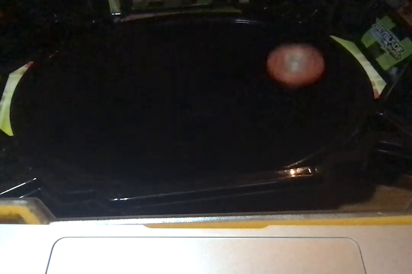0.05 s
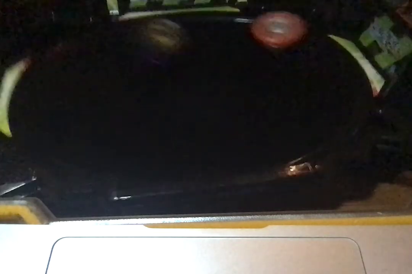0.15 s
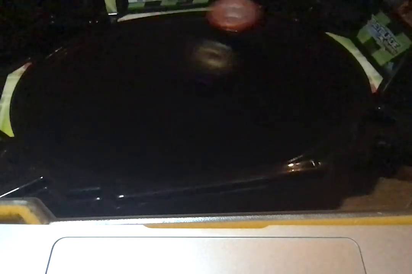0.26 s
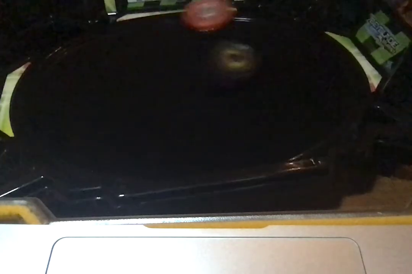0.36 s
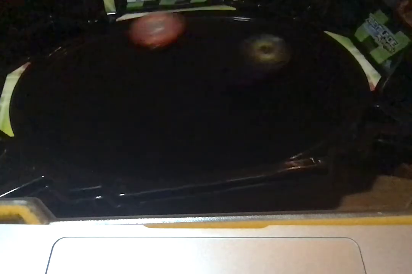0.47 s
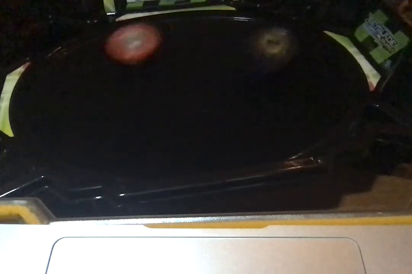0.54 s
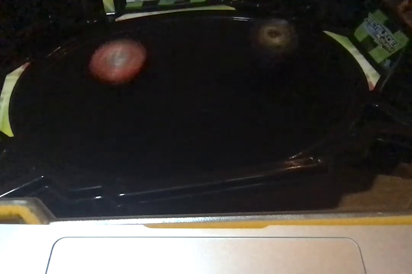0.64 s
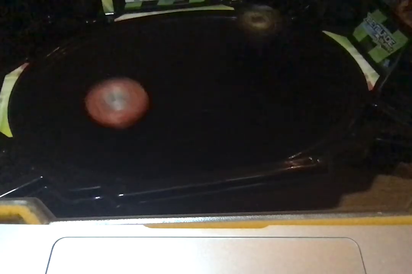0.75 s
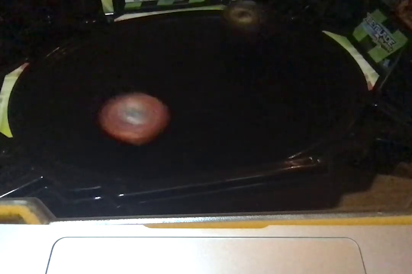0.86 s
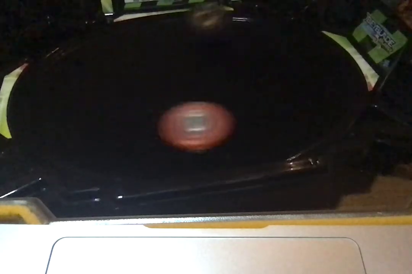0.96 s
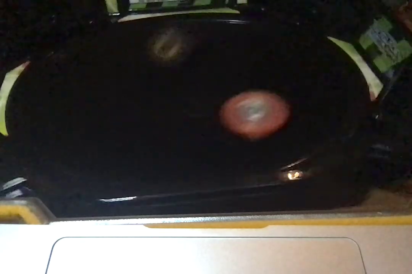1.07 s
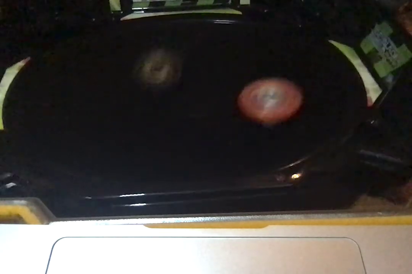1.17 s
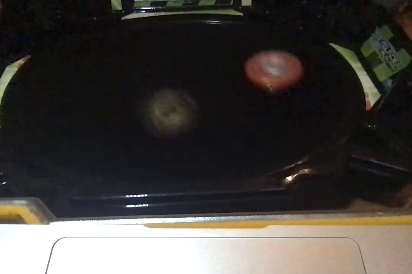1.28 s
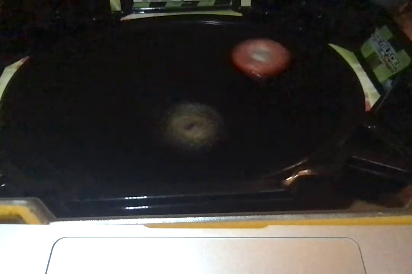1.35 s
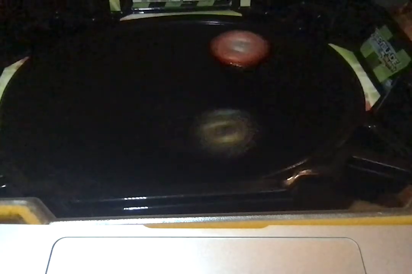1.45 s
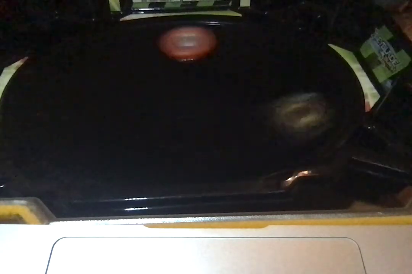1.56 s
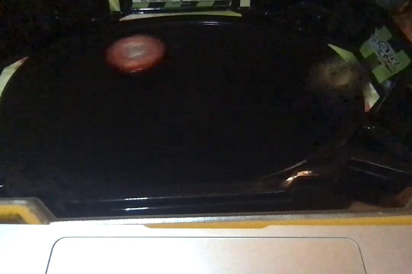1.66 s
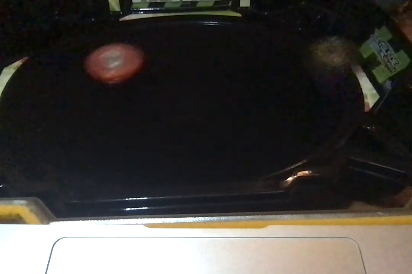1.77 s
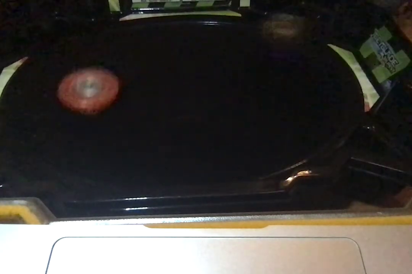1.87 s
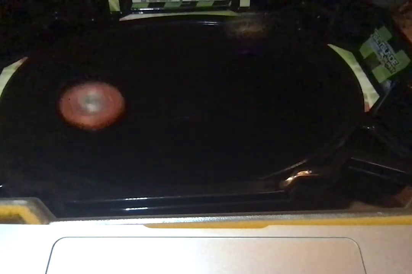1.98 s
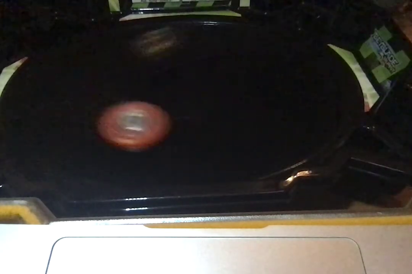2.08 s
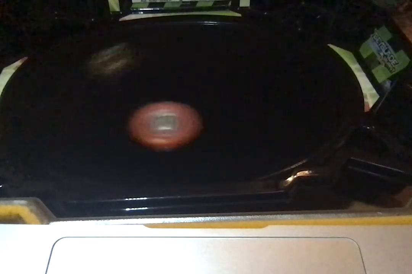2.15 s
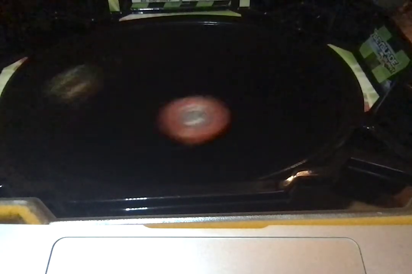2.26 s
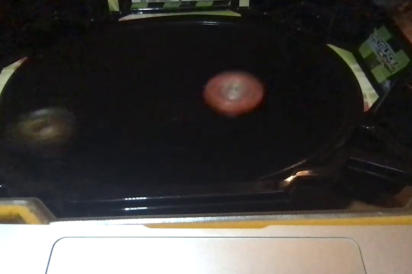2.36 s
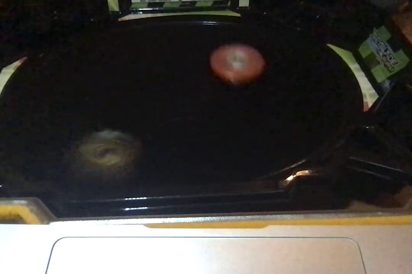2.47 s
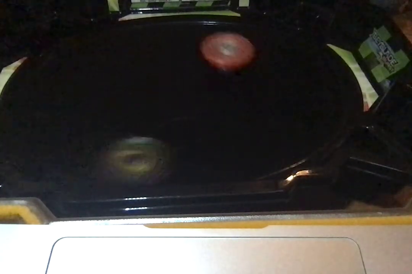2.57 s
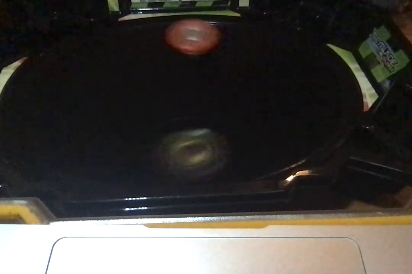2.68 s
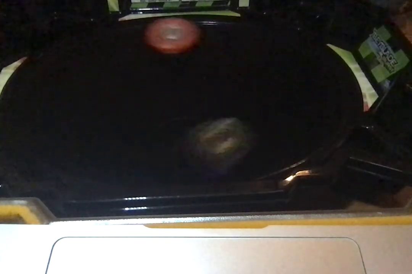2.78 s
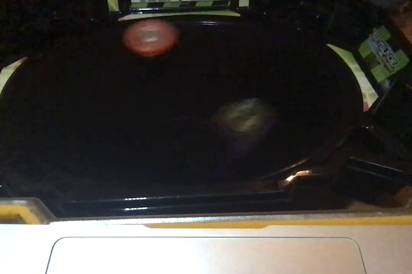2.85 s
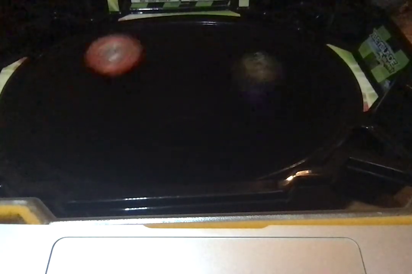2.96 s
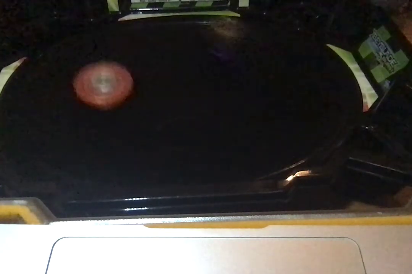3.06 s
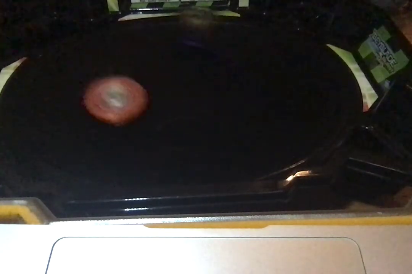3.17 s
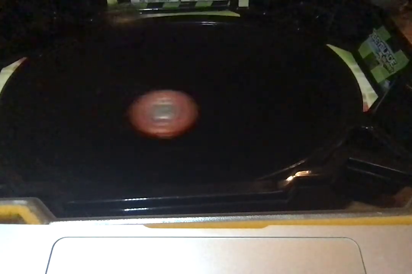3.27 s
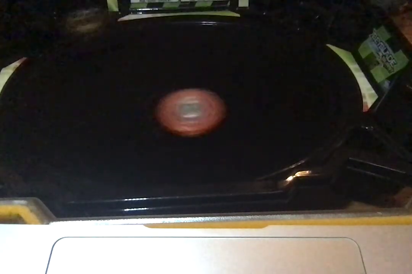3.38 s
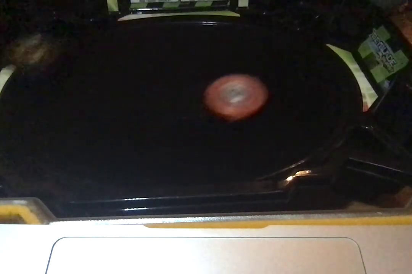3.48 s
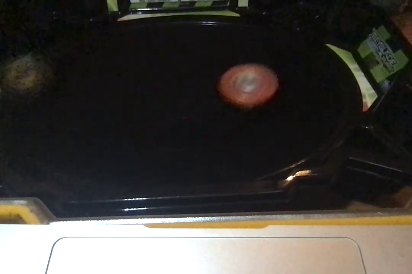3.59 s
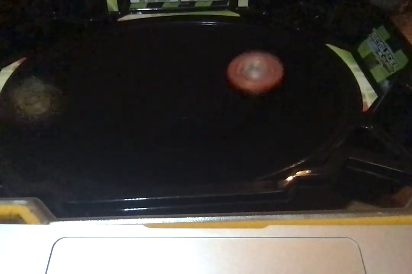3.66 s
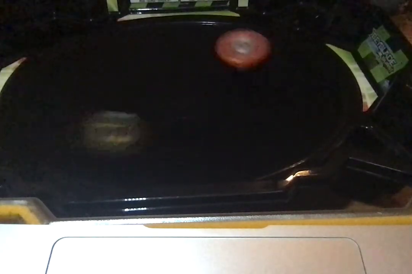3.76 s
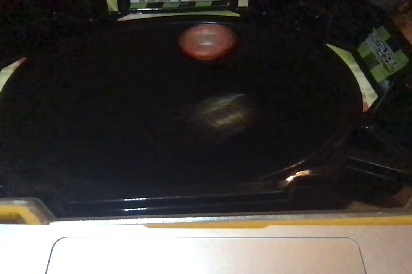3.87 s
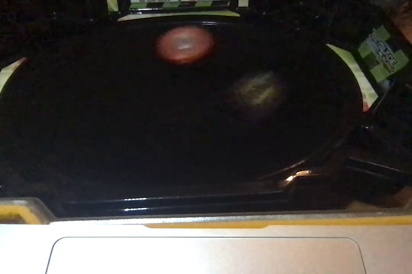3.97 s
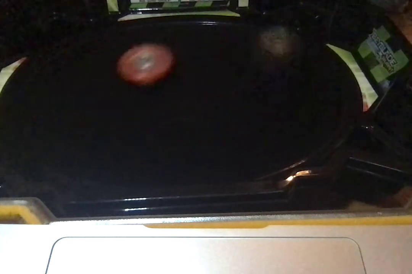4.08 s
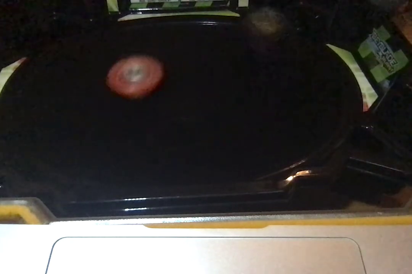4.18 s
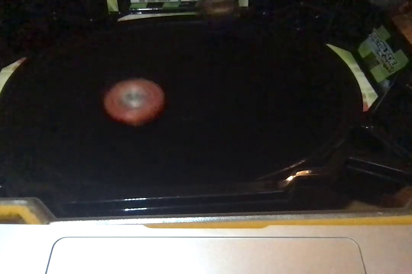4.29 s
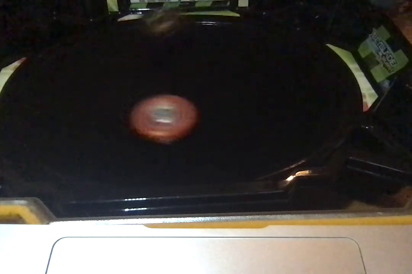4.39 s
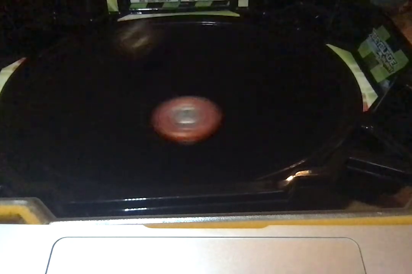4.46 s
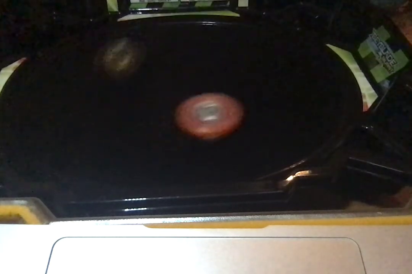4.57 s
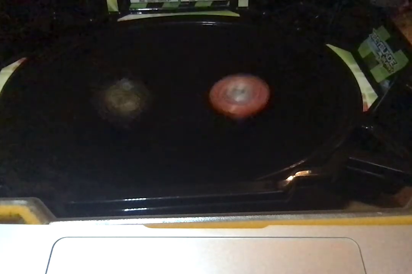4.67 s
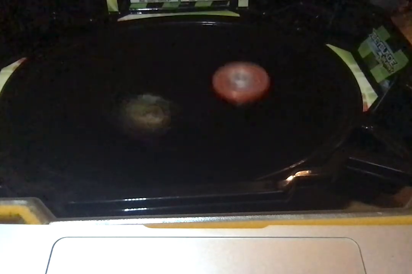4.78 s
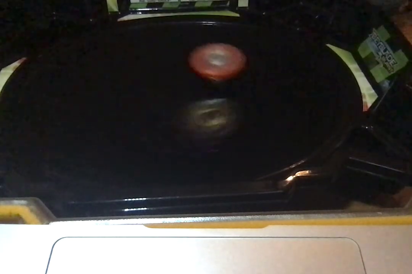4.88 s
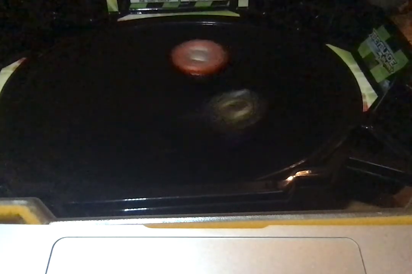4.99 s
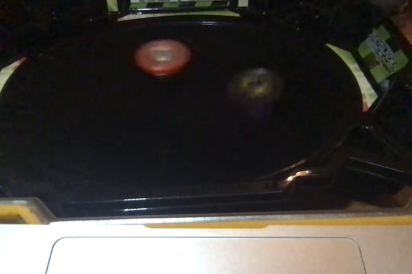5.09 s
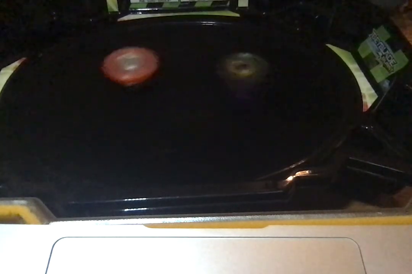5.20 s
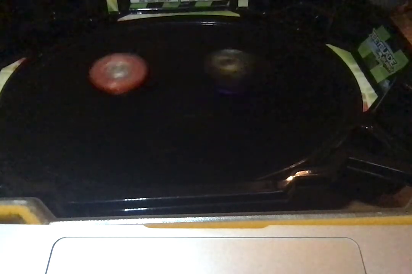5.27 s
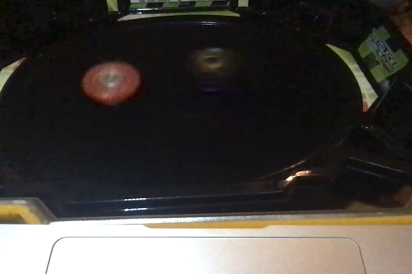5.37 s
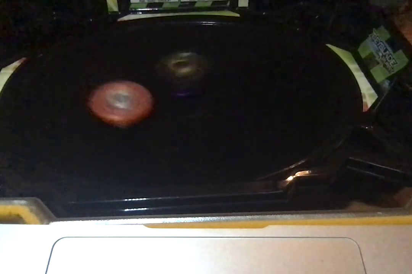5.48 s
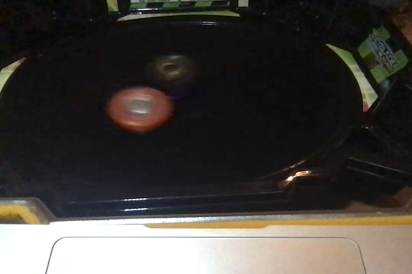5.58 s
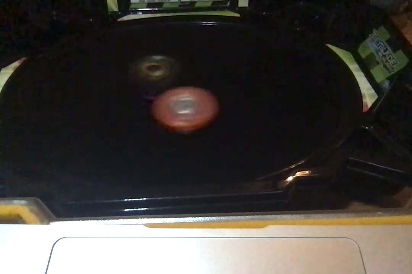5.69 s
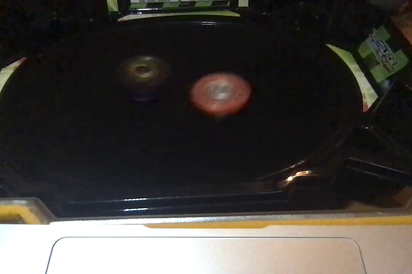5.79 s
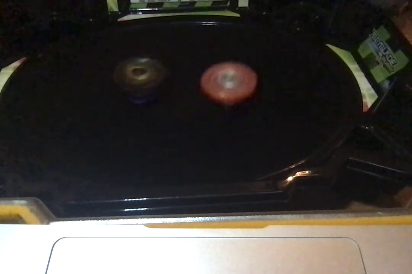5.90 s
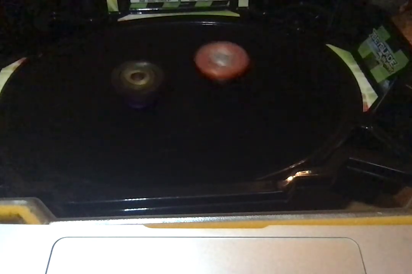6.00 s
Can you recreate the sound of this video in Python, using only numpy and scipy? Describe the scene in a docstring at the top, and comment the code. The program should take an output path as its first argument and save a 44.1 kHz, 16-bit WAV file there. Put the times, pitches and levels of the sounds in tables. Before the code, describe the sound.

A toy launcher snaps right at the start, and a spinning top lands in a thin plastic bowl with heavy, slightly distorted thumps. It bounces and skitters in quick ticks through the first 1.5 seconds. Its tip makes a buzzing scrape that swells and fades as it circles, peaking around 1.2, 2.1, 3.1, 3.9 and 4.6 seconds, with faint high squeaks early on. Underneath, the bowl rumbles and a second top hums low and smoothly.

Light knocks against the wall come around 1.5 seconds, a sharper hit at 2.3 starts a clatter lasting until 2.7, and rapid ticking follows until about 3.3. Another knock comes at 4.2. The whirring slowly drops in pitch and softens. At 5.6 seconds the metal rims clash with a sharp, briefly ringing crack, and a quiet hum continues to the end at six seconds. Everything is close, in a small room.

```python
"""A toy top races round a thin plastic bowl, close by in a small room. A launcher snaps and the top
lands with heavy thumps. Its tip scuffs the floor once a turn, ringing its body and the bowl; its
unbalance makes the bowl hum; it skips and knocks against the wall. A second top runs smoothly and
only hums. Near the end their metal rims clash."""
import sys
import numpy as np
from scipy import signal
from scipy.fft import rfft, irfft, next_fast_len
from scipy.io import wavfile
from scipy.ndimage import uniform_filter1d, map_coordinates

SR = 44100
rng = np.random.default_rng(int(sys.argv[2]) if len(sys.argv) > 2 else 0)


def generate_wav(sig):
    """Save sig (samples, or channels by samples) to the path in sys.argv[1] as 16-bit PCM at SR."""
    pcm = np.round(np.clip(np.atleast_2d(sig).T, -1, 1) * 32767).astype(np.int16)
    wavfile.write(sys.argv[1], SR, pcm)


N = 266364

# Levels in tables are relative.
# launcher ratchet snaps (time [s], level [dB])
RATCHET_SNAPS = [(.001, -5), (.003, -16.5), (.0123, -16.5), (.017, -23), (.021, -14.5)]
# racing top's spin speed, slowing unevenly (time [s], speed [Hz])
SPIN_CURVE = [(0, 80.65), (1.2, 78.43), (1.9, 70.93), (2.25, 68.88), (2.55, 61.32), (2.8, 62.6),
              (2.95, 56.6), (3.1, 59.06), (3.45, 55.77), (3.7, 56.23), (4.2, 54.63), (4.5, 51.56),
              (4.85, 51.62), (5.2, 49.17), (6.04, 46.06)]
# swells of the tip's scraping (peak time [s], 10 dB rise [s], 10 dB fall [s], level [dB])
SCRAPE_SWELLS = [(.22, 0.15, 0.087, -40.5), (.7, 0.49, 0.16, -50.5), (1.241, 0.26, 0.21, -37),
                 (2.071, 0.19, 0.27, -33), (3.068, 0.19, 0.2, -38.5), (3.58, 0.78, 0.064, -45),
                 (3.899, 0.25, 0.28, -33.5), (4.635, 0.21, 0.25, -34.5), (5.322, 0.07, .12, -44.5)]
# tip skitters after launch, wall hits and rough passes (start [s], end [s], depth [0-1])
SKITTER_SPELLS = [(0, .7, 0.74), (.75, .9, 0.42), (1.45, 1.64, 0.62), (2.33, 2.46, 0.67), (2.66, 2.72, 0.8),
                  (3.02, 3.1, 0.6)]
# tilted top touches mostly every second turn (start [s], end [s], even over odd turns [dB])
TILT_SPELLS = [(2.75, 3.68, 11)]
# tip squeaks at high speed (start [s], end [s], strength [0-1])
SQUEAK_SPELLS = [(.7, .8, 0.8), (1.0, 1.18, 1), (1.62, 1.66, 0.57), (1.86, 2.06, 0.74)]
# unbalance hum (time [s], once a turn [dB], twice a turn [dB])
UNBALANCE_LEVELS = [(.25, -35, -30.5), (.9, -42, -60), (1.17, -32, -37), (1.37, -22.5, -39),
                    (1.6, -37, -54), (1.95, -41, -36), (2.27, -17, -42), (2.45, -30.5, -44),
                    (2.98, -38.5, -35), (3.08, -21, -29), (3.2, -32, -34.5), (3.6, -35, -55),
                    (3.74, -31, -32), (3.87, -22, -41.5), (4.03, -46, -25), (4.16, -38, -37),
                    (4.3, -30, -46.5), (4.62, -46, -28.5), (4.85, -29.5, -44), (5.0, -42, -51.5),
                    (5.3, -33, -60), (5.7, -35, -41), (6.04, -44, -49)]
# smooth top's hum (time [s], frequency [Hz], level [dB])
SMOOTH_HUM = [(.25, 65.26, -25.5), (.45, 62.55, -31), (.58, 61.3, -15.5), (.72, 61.6, -33.5),
              (.86, 60.6, -17), (1.0, 56.6, -39), (1.38, 57.3, -23.5), (1.7, 60.3, -27.5), (2.9, 55, -30.5),
              (6, 48.9, -63.5)]
# hard landings and wall hits (time [s], click level [dB], wall level [dB])
KNOCK_HITS = [(0.0381, -11, -9.5), (0.045, -10, -8.5), (0.1328, -22, -12), (.168, -17.5, -20.5),
              (.177, -18, -12), (.208, -17, -23), (0.223, -30, -19), (1.425, -22.5, -24),
              (1.494, -22, -27.5), (1.577, -22, -30), (1.6405, -34.5, -25), (1.6571, -27.5, -25),
              (1.6945, -21, -37), (2.3037, -8, -17.5), (2.3688, -23.5, -20.5), (2.4204, -33, -24.5),
              (2.4567, -26, -27), (2.49, -29.5, -28.5), (2.5598, -14.5, -15), (2.5752, -21.5, -22),
              (2.659, -30, -34), (2.6729, -25.5, -24), (2.7048, -20, -25), (4.2082, -19, -22)]
# jolts of the whole bowl (time [s], level [dB])
THUMP_HITS = [(.0385, 6), (.134, 2), (.177, -7), (.645, -21), (2.308, -14), (2.712, -21), (5.605, -28)]
# tip landings after skips (time [s], level [dB])
SKIP_HITS = [(.2652, -19), (0.3136, -12), (.3229, -14.5), (0.337, -22), (0.347, -16.5), (0.3561, -13),
             (.389, -14), (0.4264, -11), (0.4695, -15.5), (0.5054, -15.5), (0.554, -16), (0.5614, -20.5),
             (0.608, -15.5), (0.6455, -11.5), (.6646, -28), (0.6832, -21.5), (0.6996, -35), (0.723, -29),
             (0.7485, -28), (0.762, -20.5), (0.7837, -25.5), (0.85, -25.5), (0.8866, -25.5), (0.9258, -14),
             (1.116, -14), (1.142, -13), (1.1677, -16), (1.178, -20), (1.206, -13.5), (1.2308, -18),
             (1.256, -18), (1.27, -17), (1.296, -10.5), (1.308, -19), (1.3349, -13), (1.3748, -16),
             (1.3845, -26), (1.4567, -20), (1.6126, -26), (1.6273, -23.5), (2.0029, -16), (2.114, -18),
             (2.201, -29), (2.2336, -17), (2.2753, -27), (2.7218, -26), (2.7463, -26), (2.7859, -18.5),
             (2.8485, -19.5), (2.88, -22.5), (2.9117, -23), (2.9884, -18.5), (3.022, -17.5), (3.0542, -19),
             (3.0868, -21), (3.1199, -23), (3.153, -20), (3.186, -30), (3.2191, -20.5), (3.253, -17),
             (3.2863, -13.5), (3.38, -27.5), (3.457, -14.5), (3.5797, -21.5), (3.9156, -24), (4.008, -27),
             (4.2629, -19.5), (4.802, -18.5), (4.8553, -22.5)]
# tops graze, then clash (time [s], level [dB])
CLASH_HITS = [(5.574, -35), (5.5796, -24.5), (5.583, -29.5), (5.599, -9)]

# resonances (frequency [Hz], level [dB])
BODY_MODES = [(3550, -5.5), (6200, -2), (7000, 3), (8050, 5)]  # racing top's hollow body
METAL_RIM_MODES = [(2760, -18.5), (3290, -13), (5950, -14), (6750, -6.5), (7290, -2), (8420, -5.5),
                   (9400, 4), (10100, -5.5), (12050, -9)]
# bowl resonances (frequency [Hz], level [dB], t60 [s])
BOWL_WALL_MODES = [(701, -7.5, 0.058), (862, -6, 0.05), (1149, -1, 0.03), (1435, -6, .03),
                   (1648, -6.5, 0.035), (2580, -4, 0.0031), (3300, -16, 0.041)]
BOWL_LOW_MODES = [(64, -18.5, 0.33), (81, 5.5, 0.043), (118.3, -3, 0.079), (217, -25.5, 0.16)]
# room decay (frequency [Hz], t60 [s])
ROOM_DECAY = [(150, 0.86), (2800, 0.16), (7000, 0.15), (14000, 0.13)]

# spectra (frequency [Hz], density [dB])
CRACK_SPECTRUM = [(300, -28.5), (2000, -16.5), (3000, -8), (4400, -11.5), (6000, 0), (7100, 0.5),
                  (9400, -9), (13500, -13.5), (16000, -30)]
SHIMMER_SPECTRUM = [(300, -20), (1000, -6), (4000, -17), (5500, -2.5), (9000, -6), (10500, -19),
                    (16000, -38)]  # crack as sent towards the room's walls
RASP_SPECTRUM = [(900, -24.5), (1600, -2.5), (3400, 2.5), (5000, -7), (6200, 3.5), (8400, 0.5), (9100, -12),
                 (10000, -9), (11200, -25.5), (13000, -25.5), (16000, -44)]
FLOOR_SPECTRUM = [(120, -26), (240, -4), (440, 2), (530, -2.5), (720, 4.5), (1200, 2.5), (1600, 0),
                  (1950, -10.5), (5000, -15), (10000, -41)]
RUMBLE_SPECTRUM = [(16, -30), (32, 0.5), (65, 2.5), (135, -7.5), (300, -30.5), (800, -76)]
SQUEAK_SPECTRUM = [(10500, -24.5), (11750, 3), (12300, -14), (13000, -1), (13800, 5.5), (14500, -15),
                   (16000, -34)]
TICK_SPECTRUM = [(900, -17.5), (1600, -5), (3400, 3.5), (5000, -2.5), (7000, 7.5), (8400, 1), (9200, -4.5),
                 (13500, -19), (16000, -26)]
WALL_SPECTRUM = [(120, -17.5), (440, -2), (700, 2.5), (1600, -1), (2000, -16), (5000, -11.5), (10000, -43)]  # bowl wall's crowded weaker modes
AIR_SPECTRUM = [(25, -13), (60, 5), (450, -12), (900, -8.5), (1900, -26), (8000, -27.5), (12000, -50)]

SCUFF_ATTACK_S, SCUFF_HOLD_S, SCUFF_RELEASE_S = 0.00028, 0.0027, 0.0015
SCUFF_SPREAD_DB, SKITTER_SPREAD_DB = 1.8, 9.5
DRAG_DB, DRAG_DB_PER_HZ = -28.5, 0.5458
ONSET_S, SETTLE_S, TILT_S, CALM_SKITTER = 0.053, 0.14, 0.021, 0.017
GLIDE_DB, SKITTER_SCUFF_DB = -67, -48.5  # tip between swells
FLOOR_DB, FLOOR_EXPONENT, SKITTER_FLOOR_DB = -13.5, 0.66, -40
RUMBLE_DB, RUMBLE_EXPONENT, RUMBLE_DB_PER_HZ = -32.5, 0.38, 0.5159
SQUEAK_DB, SIZZLE_DB = -59, -33


def amp(db):
    """Decibels to gain."""
    return 10 ** (np.asarray(db) / 20)


def unit(x):
    """Scale to rms 1."""
    return x / np.sqrt(np.mean(x ** 2) + 1e-20)


def along(points, hz):
    """Interpolate (frequency [Hz], value) points on a log axis."""
    knots_hz, values = np.transpose(points)
    return np.interp(np.log(hz + 1), np.log(knots_hz), values)


def curves(rows):
    """Per-sample curve for each column after the time."""
    times_s, *columns = np.transpose(rows)
    return [np.interp(np.arange(N) / SR, times_s, column) for column in columns]


def spells(rows, attack_s, release_s):
    """State that ramps up before each start, holds, and decays after the end."""
    t = np.arange(N) / SR
    return np.max([depth * np.clip((t - start) / attack_s + 1, 0, 1)
                   * np.exp(-np.maximum(t - end, 0) / release_s) for start, end, depth in rows], axis=0)


def wobble(rate_hz):
    """Smooth random curve."""
    knots = rng.standard_normal(int(N * rate_hz / SR) + 4)
    return map_coordinates(knots, [np.arange(N) * rate_hz / SR])


def coloured(x, spectrum):
    """Minimum-phase filter; keeps the power of white noise."""
    size = next_fast_len(N + SR // 2, real=True)
    gain = unit(amp(along(spectrum, np.fft.rfftfreq(size, 1 / SR))))
    cepstrum = irfft(np.log(gain), size)
    cepstrum[1:size // 2] *= 2
    cepstrum[size // 2 + 1:] = 0
    return irfft(rfft(x, size) * np.exp(rfft(cepstrum)), size)[:N]


def noise(spectrum):
    """Coloured noise, rms 1."""
    return coloured(rng.standard_normal(N), spectrum)


def grit(spread_db):
    """White noise of unequal micro-impacts."""
    return unit(rng.standard_normal(N) * amp(spread_db * rng.standard_normal(N)))


def patchy(x, depth_db, frame_samples=256):
    """x at rms 1 with randomly shifting colour."""
    frames = signal.stft(x, nperseg=frame_samples)[2]
    field = uniform_filter1d(rng.standard_normal(frames.shape), size=4, axis=0)
    field = uniform_filter1d(field, size=6, axis=1)
    gain = amp(depth_db * np.tanh(unit(field)))
    return unit(signal.istft(frames * gain, nperseg=frame_samples)[1][:N])


def blows(times_s, db):
    """One impulse per event."""
    return np.bincount(np.clip(np.round(times_s * SR).astype(int), 0, N - 1), amp(db), N)


def decay(force, t60_s):
    """Amplitude of a body that stores and loses the energy of each push."""
    retained = amp(-60 / (t60_s * SR)) ** 2
    return np.sqrt(signal.lfilter([1], [1, -retained], force ** 2))


def cracks(hits, t60_s):
    """Hard on hard, ratchet or rims: short, bright noise bursts."""
    envelope = decay(blows(*np.transpose(hits)), t60_s)
    return coloured(envelope * rng.standard_normal(N), CRACK_SPECTRUM)


def shimmer(hits, t60_s=0.31, build_s=0.014):
    """Cracks scatter off the room's walls into a dense, bright tail."""
    energy = decay(blows(*np.transpose(hits)), t60_s=0.021) ** 2
    t = np.arange(SR // 2) / SR
    tail = amp(-60 * t / t60_s) ** 2 * (1 - np.exp(-(t / build_s) ** 2))
    envelope = np.sqrt(np.abs(signal.fftconvolve(energy, tail / tail.sum())[:N]))
    return envelope * noise(SHIMMER_SPECTRUM)


def tip_contact(shape=2.39):
    """Scraping swells and fades as the top moves round the bowl; shape > 2 is flatter than a bell."""
    t = np.arange(N) / SR
    swells = [amp(db - 10 * np.abs((t - peak_s) / np.where(t < peak_s, rise_s, fall_s)) ** shape)
              for peak_s, rise_s, fall_s, db in SCRAPE_SWELLS]
    return np.linalg.norm(swells, axis=0)


def scuffs(turns, spin_hz, skitter, tilt_db, back_width_s=0.0009):
    """Tip force: an abrupt scuff each turn, a weak one half a turn later, light drag between."""
    turns = turns + 0.53 * skitter * wobble(55)  # skittering tip lands early or late
    turn = np.round(turns).astype(int)
    even, odd = amp(tilt_db / 2), amp(-tilt_db / 2)
    size = np.where(turn % 2, odd, even) / np.sqrt((even ** 2 + odd ** 2) / 2)
    scatter = np.minimum(rng.standard_normal(turn.max() + 1), 1)[turn]
    size = size * amp((SCUFF_SPREAD_DB + SKITTER_SPREAD_DB * skitter) * scatter)
    since_s = (turns - turn) / spin_hz
    attack = np.minimum(since_s + SCUFF_HOLD_S / 2, 0) / SCUFF_ATTACK_S
    release = np.maximum(since_s - SCUFF_HOLD_S / 2, 0) / SCUFF_RELEASE_S
    front = size * np.exp(attack - release)
    from_half_turn_s = 0.5 / spin_hz - np.abs(since_s)
    back = amp(-28 + 9 * np.tanh(wobble(60))) * np.exp(-from_half_turn_s / back_width_s)
    speed_db = DRAG_DB_PER_HZ * (spin_hz - spin_hz.min())
    drag = amp(DRAG_DB + speed_db + 4.2 * skitter + 10 * np.tanh(wobble(400)))
    return unit(np.sqrt(front ** 2 + back ** 2 + drag ** 2))


def pings(force, t60_s, spread_db, drift):
    """Top's body rings; mode levels and pitches shift as it turns."""
    ring, power = 0, 0
    for hz, db in BODY_MODES:
        glide = drift * np.tanh(wobble(70) + 0.296 * wobble(1500))
        gain = amp(db + spread_db * np.tanh(wobble(60)))
        ring = ring + gain * np.sin(2 * np.pi * np.cumsum(hz * (1 + glide)) / SR)
        power = power + gain ** 2
    envelope = decay(force, t60_s)
    return unit(ring / np.sqrt(power)) * envelope * np.linalg.norm(force) / np.linalg.norm(envelope)


def bowl_floor(envelope, depth_db):
    """Crowded modes of the plastic; the strong ones change with the top's position."""
    modes = patchy(rng.standard_normal(N), depth_db, frame_samples=1024)
    return coloured(envelope * modes, FLOOR_SPECTRUM)


def unbalance(turns, tilt_db, waver_db=1):
    """Bowl hums once and twice a turn; tilt adds a half-rate wobble."""
    first_db, second_db = [db + waver_db * wobble(19) for db in curves(UNBALANCE_LEVELS)]
    angle = 2 * np.pi * turns
    half = amp(-1.5) * (1 - amp(-tilt_db)) * np.cos(angle / 2)
    return np.sqrt(2) * (amp(first_db) * (half + np.cos(angle)) + amp(second_db) * np.sin(2 * angle))


def racing_top():
    """Tip rasps, pings and squeaks; the thin floor rings per scuff and rumbles more at speed."""
    spin_hz, = curves(SPIN_CURVE)
    turns = np.cumsum(spin_hz) / SR
    contact = tip_contact()
    skitter = np.maximum(spells(SKITTER_SPELLS, ONSET_S, SETTLE_S), CALM_SKITTER)
    tilt_db = spells(TILT_SPELLS, TILT_S, TILT_S)
    force = scuffs(turns, spin_hz, skitter, tilt_db)

    scrape = force * np.sqrt(contact ** 2 + amp(GLIDE_DB) ** 2 + (amp(SKITTER_SCUFF_DB) * skitter) ** 2)
    rasp = coloured(amp(-3) * scrape * patchy(grit(spread_db=5), depth_db=8), RASP_SPECTRUM)
    ring = amp(-6) * pings(scrape, t60_s=0.0041, spread_db=11, drift=0.044)

    shake = np.hypot(amp(FLOOR_DB) * contact ** FLOOR_EXPONENT, amp(SKITTER_FLOOR_DB) * skitter)
    floor = bowl_floor(shake * unit(decay(force, t60_s=0.042)), depth_db=7)
    rumble_db = RUMBLE_DB + RUMBLE_DB_PER_HZ * (spin_hz - spin_hz.mean())
    rumble = amp(rumble_db) * unit(shake) ** RUMBLE_EXPONENT * noise(RUMBLE_SPECTRUM)
    lumps = amp(4 * wobble(16))

    squeak_gain = amp(SQUEAK_DB) * spells(SQUEAK_SPELLS, ONSET_S, ONSET_S) + amp(SIZZLE_DB) * contact
    squeak = squeak_gain * unit(decay(force, t60_s=0.008)) * patchy(noise(SQUEAK_SPECTRUM), depth_db=13)
    return rasp + ring + squeak + floor + lumps * rumble + unbalance(turns, tilt_db)


def smooth_top(pitch_waver=0.0092):
    """Low, slightly unsteady hum at the rate of spin."""
    hz, db = curves(SMOOTH_HUM)
    hz = hz * (1 + pitch_waver * wobble(5))
    return np.sqrt(2) * amp(db - 2 + 0.9 * wobble(33)) * np.sin(2 * np.pi * np.cumsum(hz) / SR)


def room(x, build_s):
    """Small room's tail; lows last longest."""
    hz, t, frames = signal.stft(rng.standard_normal(SR // 2), SR, nperseg=256)
    tail = signal.istft(frames * amp(-60 * t / along(ROOM_DECAY, hz)[:, None]), SR, nperseg=256)[1]
    tail = tail * (1 - np.exp(-(np.arange(len(tail)) / SR / build_s) ** 2))
    return signal.fftconvolve(x, tail / np.linalg.norm(tail))[:N]


def knocks():
    """Top clicks and pings; the wall clacks, its modes differing from place to place."""
    times_s, click_db, wall_db = np.transpose(KNOCK_HITS)
    click = decay(blows(times_s, click_db - 9.5), t60_s=0.024)
    t = np.arange(SR // 8) / SR
    clack = np.zeros(N + len(t))
    for start_s, hit_db in zip(times_s, wall_db):
        for hz, db, t60_s in BOWL_WALL_MODES:
            place_db, detune = rng.normal(0, 1.5), rng.normal(0, 0.04)
            envelope = amp(hit_db + db + place_db - 2.5 - 60 * t / t60_s)
            mode = np.sin(2 * np.pi * hz * (1 + detune) * t) * rng.choice([-1, 1])
            clack[int(start_s * SR):][:len(t)] += envelope * mode
    shake = decay(blows(times_s, wall_db - 5.5), t60_s=0.055)
    wall = coloured(shake * rng.standard_normal(N), WALL_SPECTRUM)
    ring = amp(-4.5) * pings(click, t60_s=0.005, spread_db=8, drift=0.04)
    tick = coloured(click * patchy(grit(spread_db=3), depth_db=12), TICK_SPECTRUM)
    return tick + ring + clack[:N] + wall


def thumps():
    """Whole bowl bounces in its lowest modes."""
    t = np.arange(SR // 2) / SR
    ring = sum(amp(db - 60 * t / t60_s) * np.sin(2 * np.pi * hz * t) for hz, db, t60_s in BOWL_LOW_MODES)
    return -signal.fftconvolve(blows(*np.transpose(THUMP_HITS)), ring)[:N]


def skips(median_flight_s=0.0105, rebound_loss_db=13):
    """Tip lands with a tick, rings body and floor, rebounds once."""
    times_s, db = np.transpose(SKIP_HITS)
    flight_s = median_flight_s * np.exp(0.56 * rng.standard_normal(len(times_s)))
    force = blows(times_s, db) + blows(times_s + flight_s, db - rebound_loss_db)
    tick = coloured(decay(force, t60_s=0.018) * patchy(grit(spread_db=3), depth_db=7), TICK_SPECTRUM)
    ring = pings(decay(force, t60_s=0.012), t60_s=0.0061, spread_db=16.5, drift=0.058)
    floor = bowl_floor(decay(force, t60_s=0.052), depth_db=0.5)
    return amp(-10.5) * tick + amp(-9) * ring + amp(-15.5) * floor


def clashes(t60_cycles=216):
    """Rim meets rim: dry crack, brief metallic ring."""
    t = np.arange(SR // 8) / SR
    modes = sum(amp(db - 60 * hz * t / t60_cycles) * np.sin(2 * np.pi * (hz * t + rng.random()))
                for hz, db in METAL_RIM_MODES)
    ring = signal.fftconvolve(blows(*np.transpose(CLASH_HITS)), modes)[:N]
    return amp(-8.5) * ring + amp(0.5) * cracks(CLASH_HITS, t60_s=0.019)


def scene():
    """Tops and bowl close by, room behind, over a faint steady rush."""
    tops = racing_top() + smooth_top() + skips() + knocks()
    launcher = cracks(RATCHET_SNAPS, t60_s=0.057)
    rims = clashes()
    echo = amp(-17) * room(tops, build_s=0.02) + amp(-15.5) * shimmer(RATCHET_SNAPS + CLASH_HITS)
    air = amp(-55) * noise(AIR_SPECTRUM)
    return (tops + launcher + rims + thumps() + echo + air)[None]


def record(dry):
    """Microphone clips on the heaviest thumps; brick-wall band limit."""
    ceiling, cutoff_hz = 0.72, 15900
    clipped = np.clip(dry, -ceiling, ceiling)
    size = next_fast_len(N + SR // 2)
    passband = np.fft.rfftfreq(size, 1 / SR) < cutoff_hz
    return irfft(rfft(clipped, size) * passband, size)[:, :N]


dry = scene()
out = record(dry)
generate_wav(out)
```